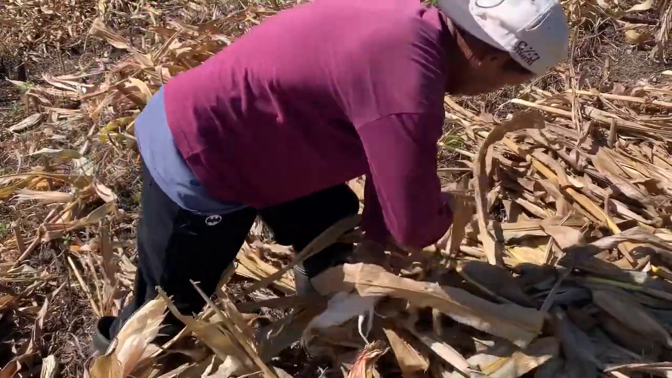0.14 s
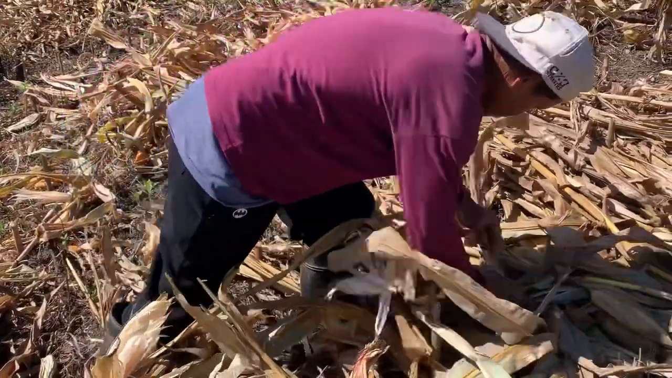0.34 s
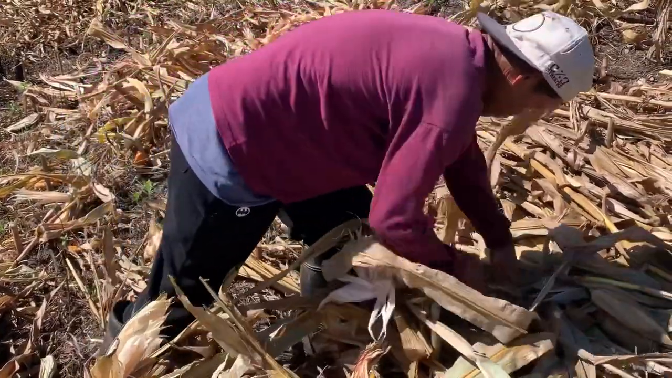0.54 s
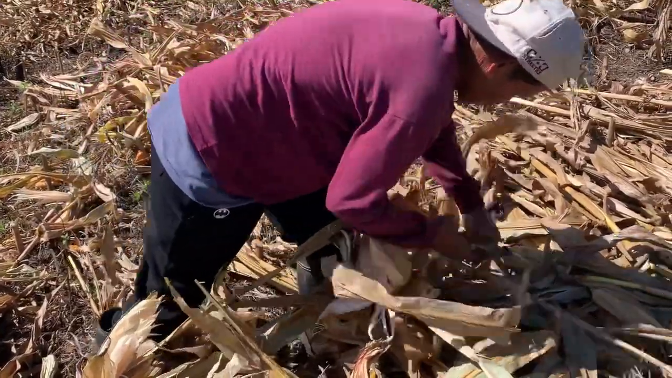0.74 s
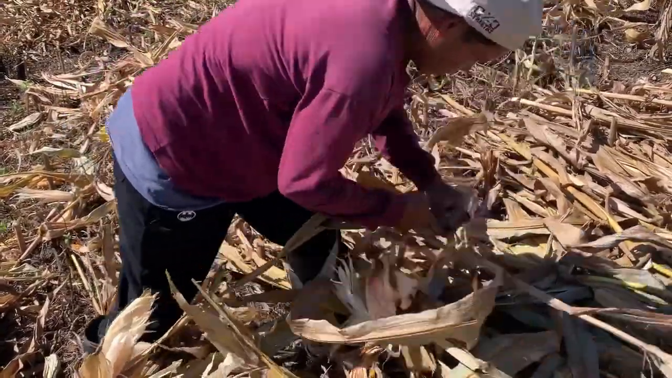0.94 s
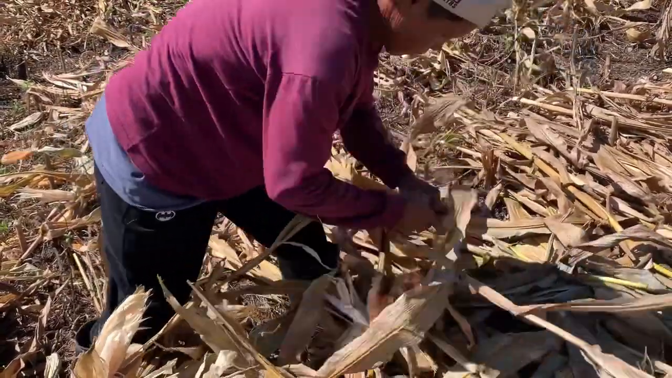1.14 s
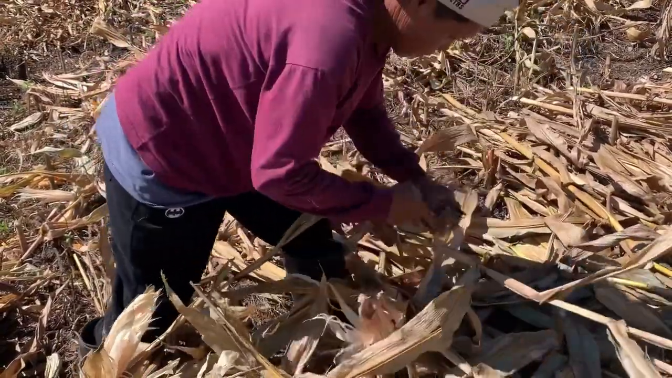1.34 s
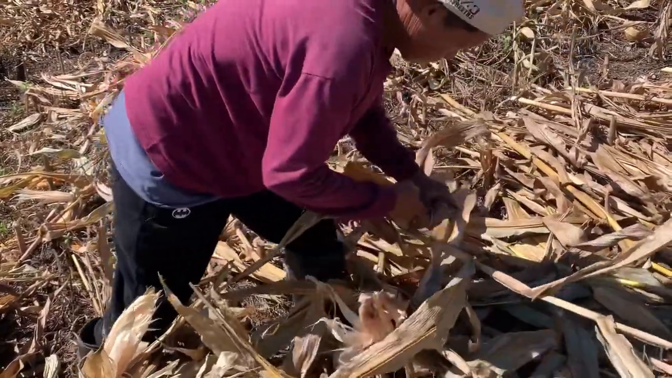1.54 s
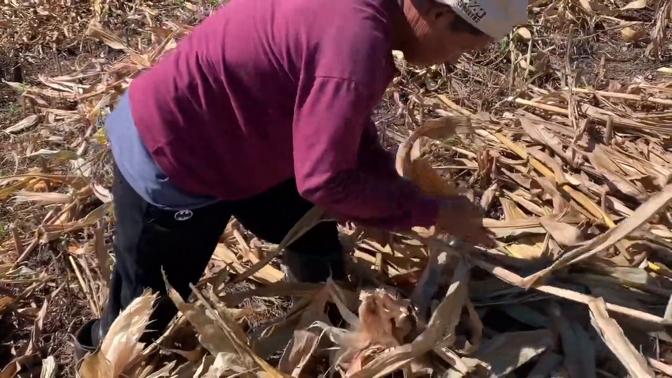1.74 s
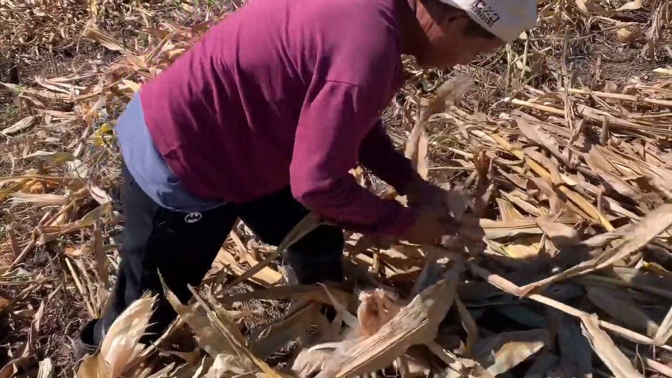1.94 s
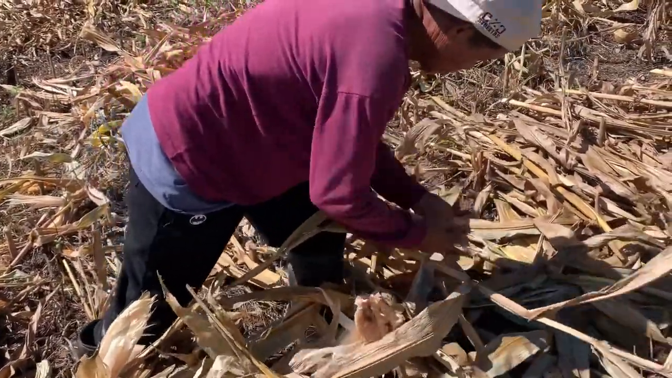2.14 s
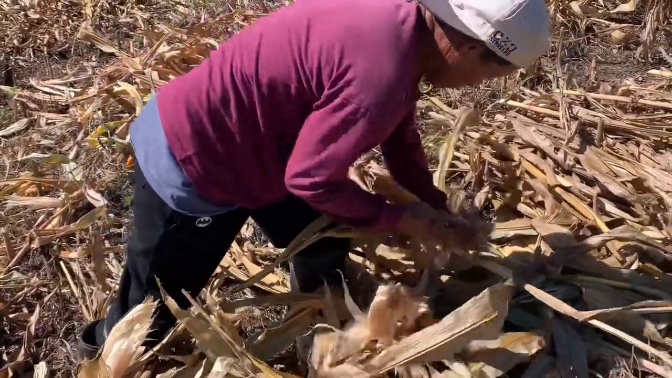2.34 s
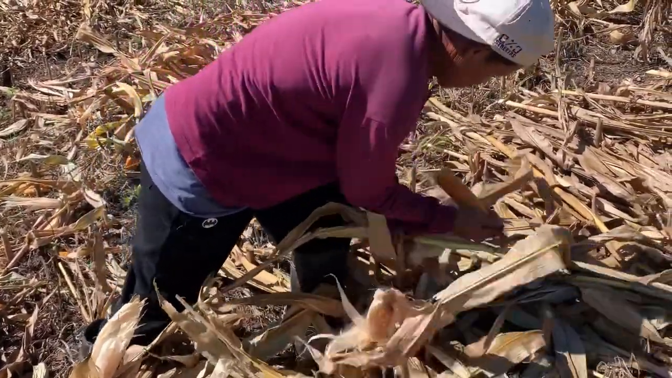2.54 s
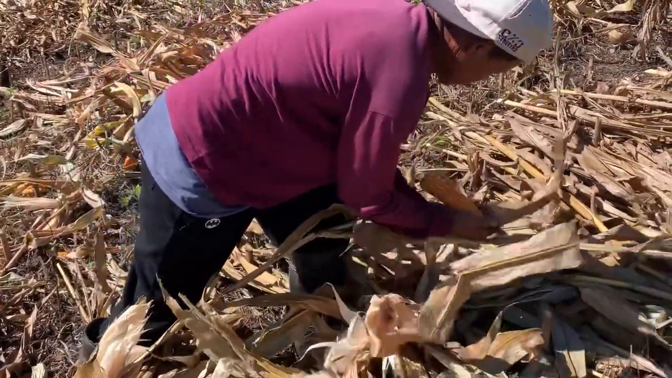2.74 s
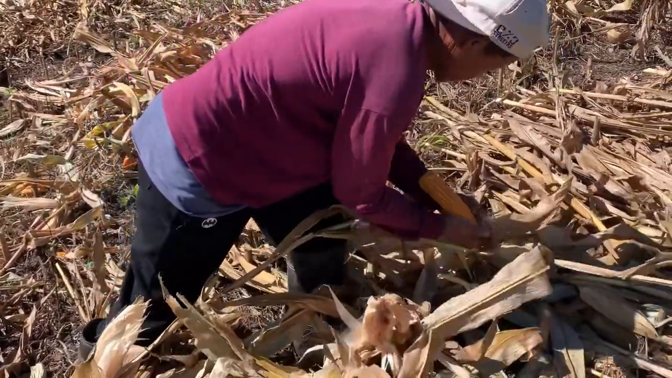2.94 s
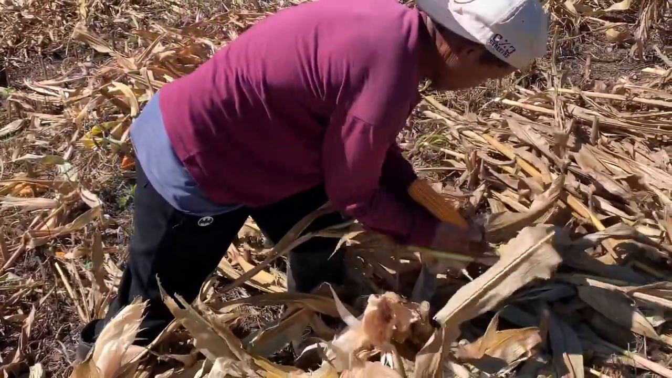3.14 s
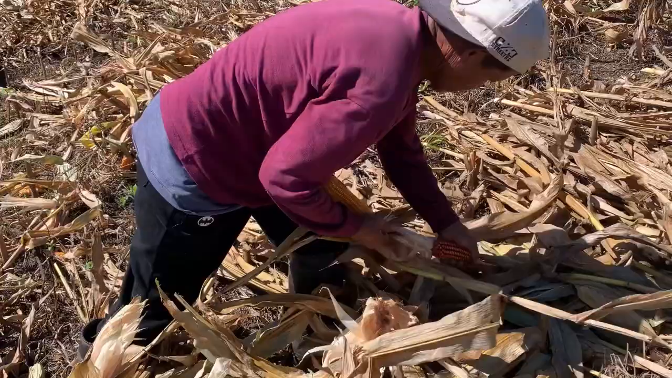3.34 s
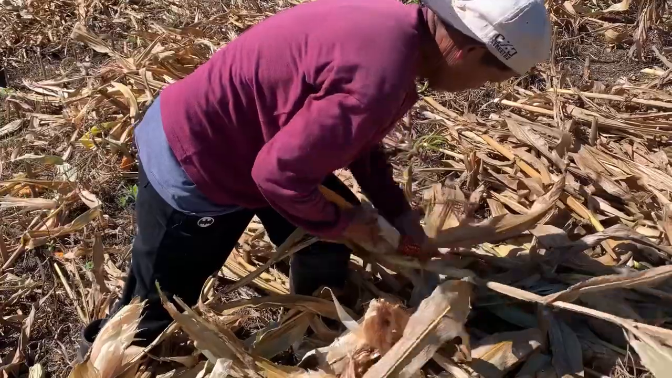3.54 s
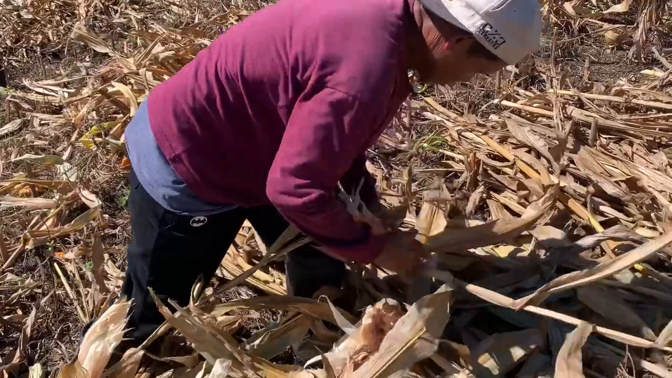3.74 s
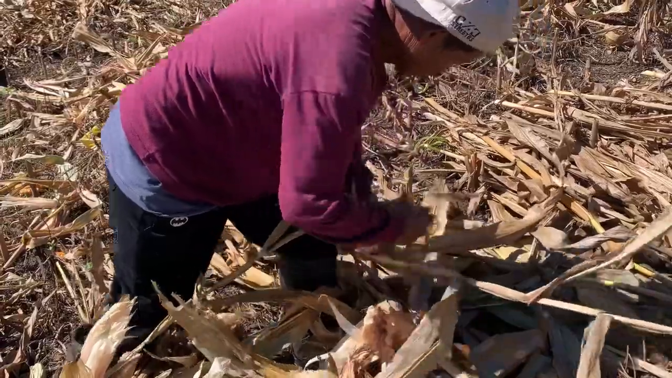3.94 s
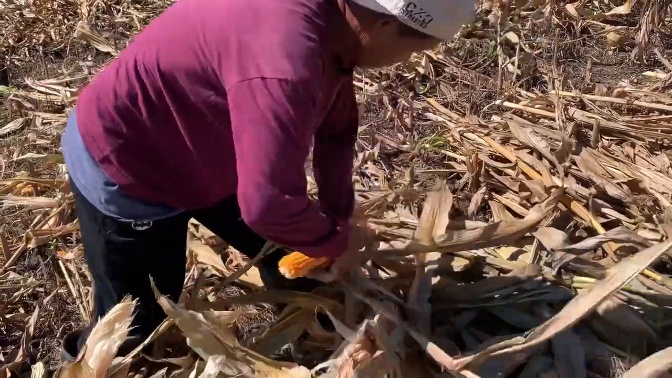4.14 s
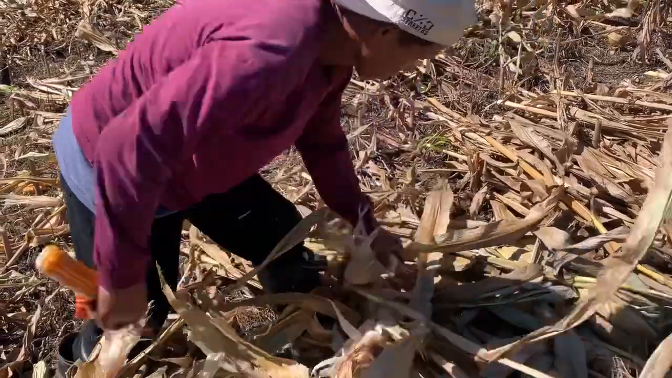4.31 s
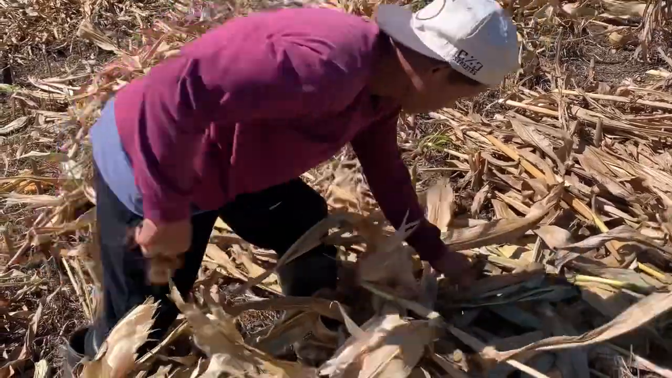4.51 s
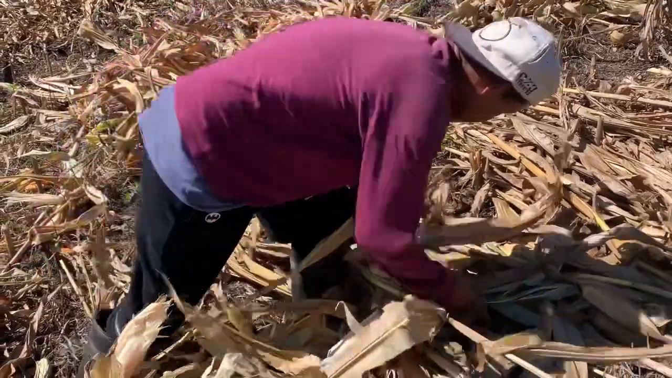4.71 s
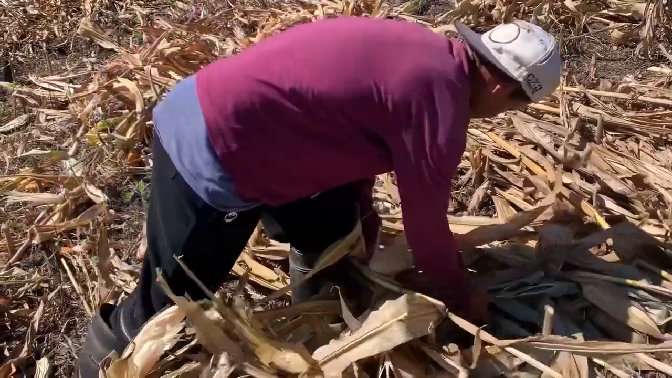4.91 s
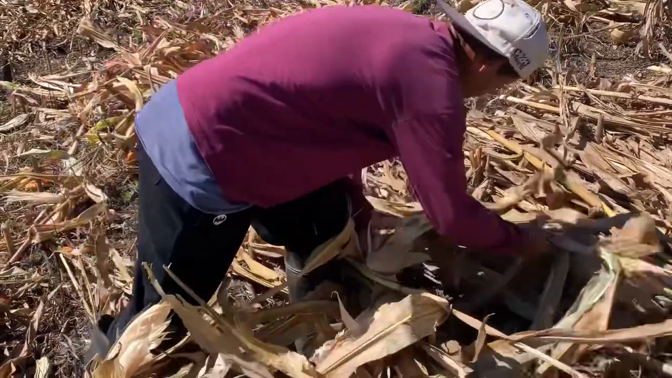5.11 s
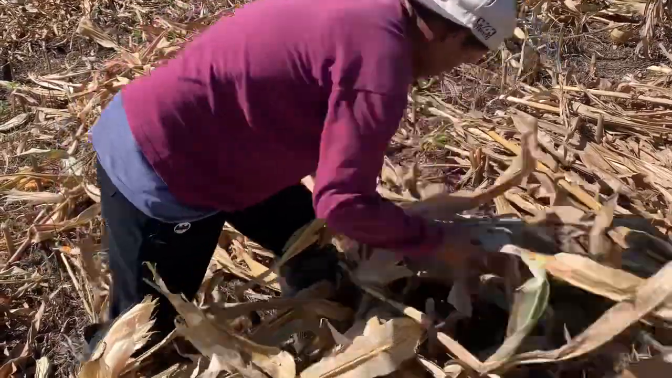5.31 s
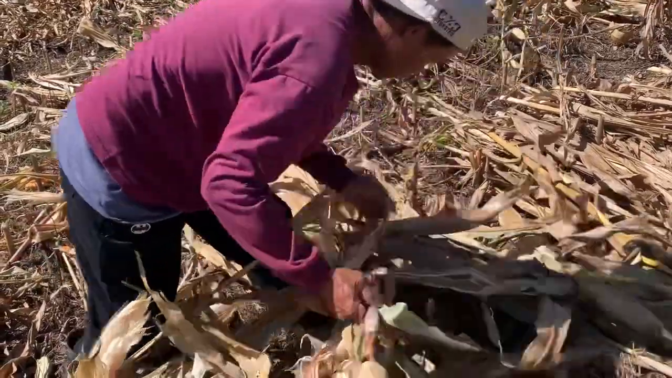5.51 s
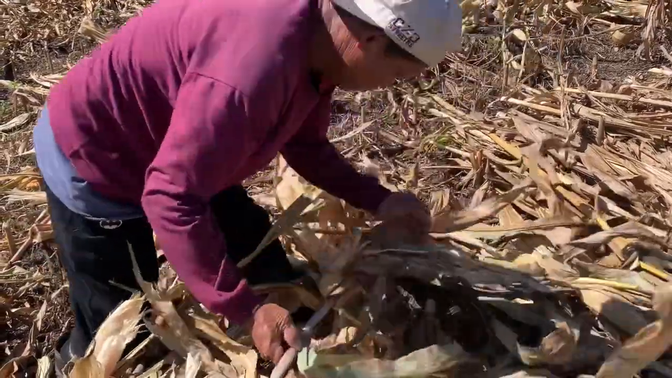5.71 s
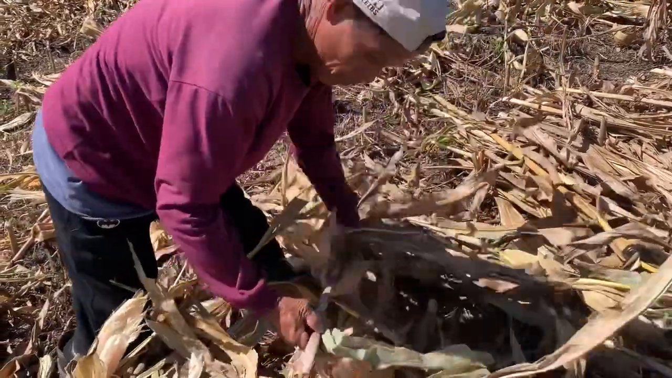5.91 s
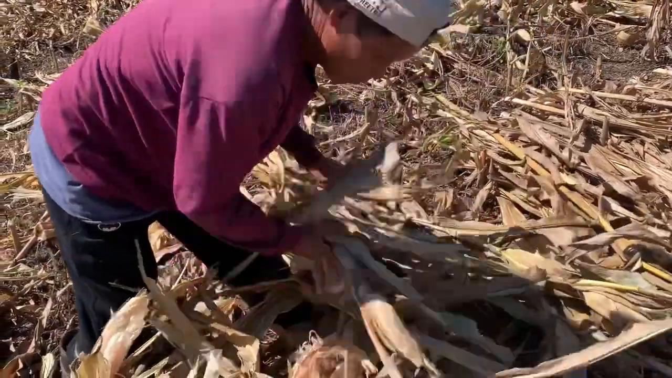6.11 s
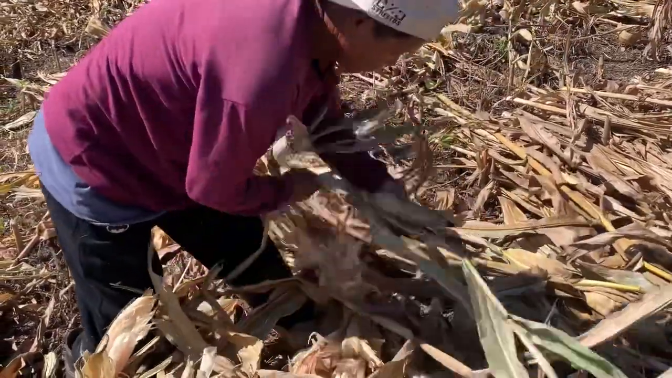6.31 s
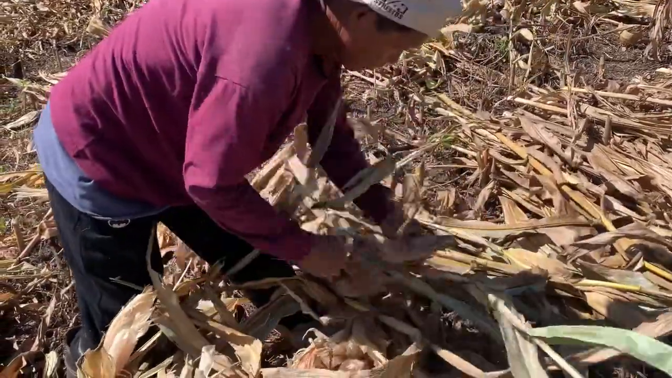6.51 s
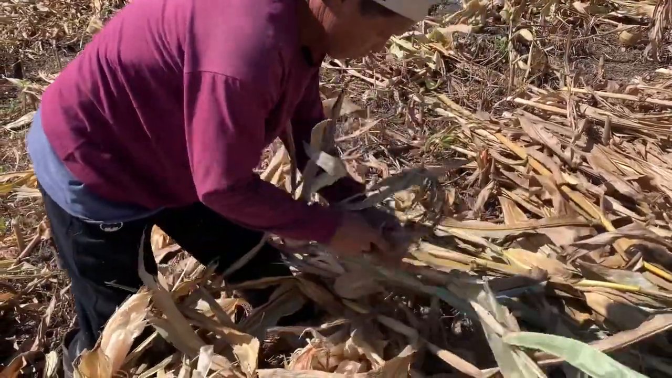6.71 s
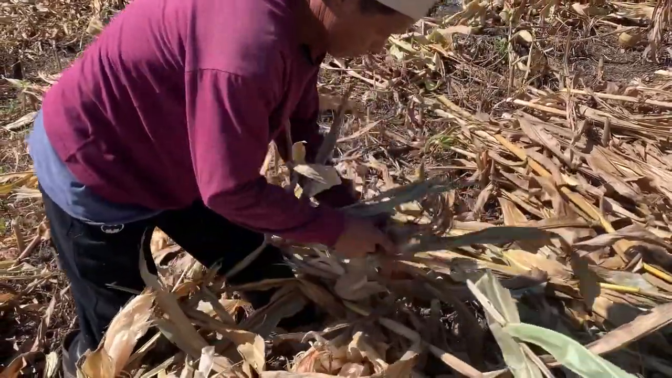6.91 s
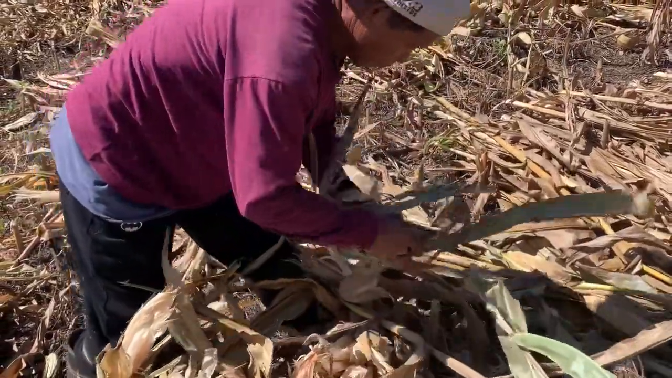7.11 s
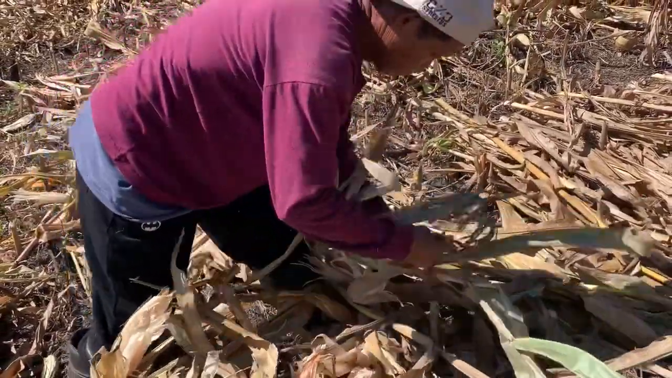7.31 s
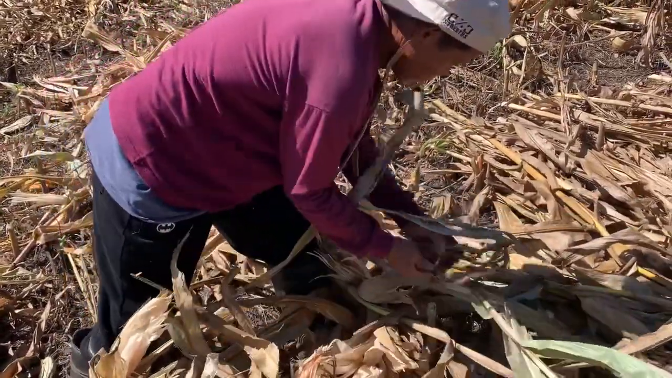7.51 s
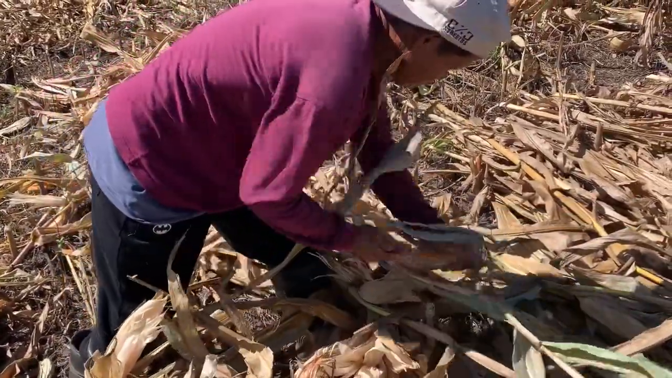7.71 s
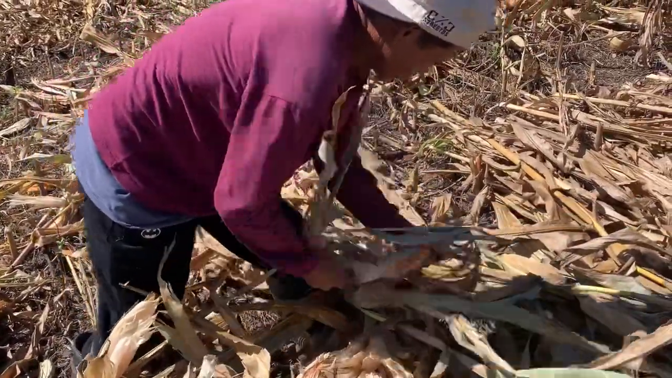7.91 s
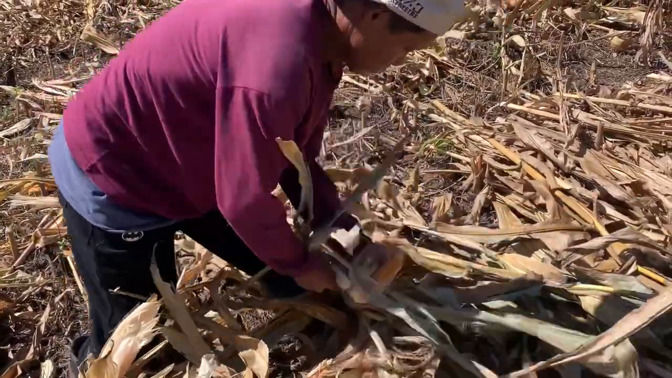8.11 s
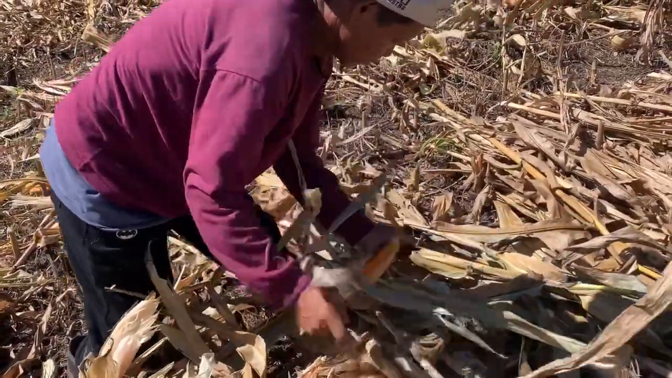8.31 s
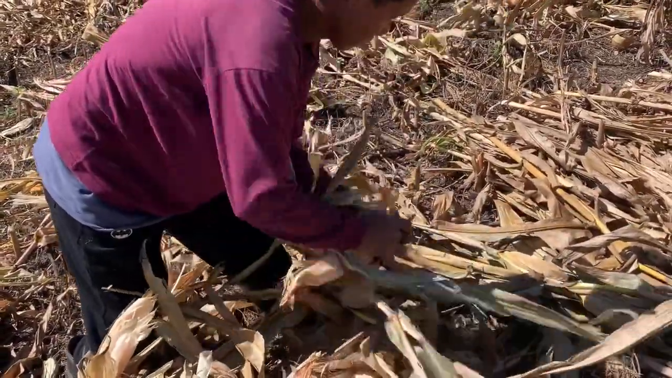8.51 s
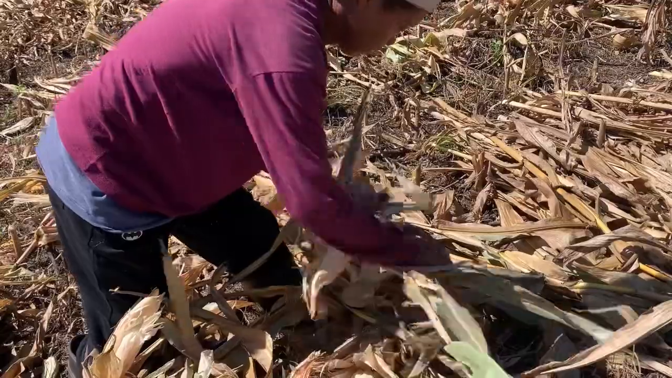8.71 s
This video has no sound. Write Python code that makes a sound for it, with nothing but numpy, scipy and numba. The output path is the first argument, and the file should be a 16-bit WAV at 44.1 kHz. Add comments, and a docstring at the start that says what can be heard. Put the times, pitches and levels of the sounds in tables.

```python
"""Dry corn husks are torn off by hand in an open field, a couple of metres from a two-port phone.
Throughout: leaves tick, crunch and fleck as decaying rings; stalks thud; filtered noise is the breeze.
First stirring and pulls; hard snaps and a knock near 2.2 s, a short lull near 3 s with snaps after it;
the strongest stirring runs from 5 to 6 s, eases until a burst of pulls near 7.7 s, and ends in
a few snaps and a low knock. The ports hear the heap with a lag and a little differently."""
import sys
import numpy as np
from scipy import signal
from scipy.fft import rfft, irfft, next_fast_len
from scipy.io import wavfile
from scipy.ndimage import uniform_filter1d, map_coordinates
from numba import njit

SR = 44100
rng = np.random.default_rng(int(sys.argv[2]) if len(sys.argv) > 2 else 0)


def dump_mix(stems):
    """Bounce the given channels to the path in sys.argv[1] as a 16-bit WAV at rate SR."""
    frames = np.atleast_2d(stems).T  # one column per channel
    limited = np.clip(frames, -1, 1)  # hard clip at full scale
    pcm = np.round(limited * 32767).astype(np.int16)
    wavfile.write(sys.argv[1], SR, pcm)


N = 385875

# breeze spectrum, tilted further in breeze(): f/Hz, density/dB per Hz
BREEZE_SPECTRUM = [(25, -29), (40, -6.5), (55, -7.5), (110, 0), (180, -10.5), (400, -8), (1000, -60)]
# heap levels: t/s, stalk thud level/dB, breeze level/dB
HEAP_LEVELS = [(0.0, -51.5, -57), (0.78, -52.5, -56.5), (2.12, -68, -61), (2.29, -42, -54.5),
               (2.36, -66, -60), (2.51, -42.5, -51.5), (2.75, -72, -60.5), (4.92, -49.5, -55),
               (4.97, -43, -50), (5.82, -49, -63), (6.02, -43.5, -56), (6.68, -58, -64), (7.6, -50, -59.5),
               (8.68, -57, -67.5), (8.75, -44, -55.5)]
# ears and stalks knocking on the heap: t/s, nominal peak level/dB, f/Hz, T60/s
STALK_KNOCKS = [(0.46, -38.5, 190, 0.064), (2.223, -19.5, 900, 0.03), (2.279, -37, 390, 0.05),
                (2.499, -31.5, 870, 0.056), (3.062, -33.5, 795, 0.054), (3.291, -26.5, 840, 0.064),
                (3.599, -33, 950, 0.038), (4.07, -38.5, 129, 0.11), (4.188, -39, 890, 0.068),
                (4.956, -33, 430, 0.03), (7.694, -29, 830, 0.047), (8.74, -36, 190, 0.079)]
# colour of the leaf: f/Hz, density/dB per Hz
LEAF_COLOUR = [(120, 15), (250, 17), (500, 11.5), (800, 3), (1100, -1), (1600, 6), (2400, 3), (4300, 5.5),
               (6500, 6.5), (9500, 9.5), (12000, 6), (15500, 10.5)]
# hands stirring the heap: t/s, rustle level/dB,
# then relative level/dB of: below 3.5 kHz (full by 1.75 kHz), near 4.4 kHz, above 6.5 kHz
HAND_STIRS = [(0.0, -34, 1, 6, 3.5), (0.6, -39.5, 0.5, 4, -3), (1.08, -32.5, -3, 9.5, 6),
              (1.49, -47, -5.5, 1, -0.5), (1.7, -34.5, -0.5, 3, 0), (2.0, -45, -1, 4.5, 2.5),
              (2.5, -37, 3, 6, 5), (3.05, -50, 0.5, 4.5, 1), (3.27, -34.5, 2, 6, 1.5),
              (3.48, -40.5, -0.5, 5.5, 2), (4.1, -39, 0, 1.5, -2), (4.54, -41, -0.5, 2.5, 0.5),
              (5.05, -28, -0.5, 3.5, 2), (5.52, -27, -3, 5.5, 4), (5.8, -36, -1.5, -1, -1),
              (6.05, -26.5, -2.5, 3.5, 3), (6.6, -37, -1.5, -1, -1), (6.65, -46, -3, -2, -2),
              (7.1, -39.5, 2, -0.5, -3), (7.7, -31, -2.5, 1, -0.5), (8.25, -35.5, 0, 2, 1),
              (8.66, -55, -1, 1.5, -5.5)]
# single pulls tearing a husk: peak t/s, level/dB, 10 dB fall time/s (5 ms at least), tilt/dB per octave
HUSK_PULLS = [(0.055, -31, 0.03, -1), (0.31, -34.5, 0.05, -0.5), (0.388, -32.5, -0.03, -4),
              (0.466, -32.5, 0, 0), (0.762, -37, -0.06, 3), (0.838, -30.5, 0.0553, 1),
              (0.96, -40.5, 0.04, 1), (1.3, -39.5, 0.1, -0.2), (2.036, -32, 0.02, -0.5),
              (2.2, -33, 0.06, 0), (2.227, -24.5, 0.0138, 0.5), (2.26, -28.5, 0.0137, 0.5),
              (2.289, -23, -0.01, -3.5), (2.539, -31.5, 0.054, 2), (2.62, -45, 0.2, 3.5),
              (2.82, -39.5, 0.02, -0.5), (2.979, -42.5, 0.07, 0.4), (3.064, -29.5, 0.017, 0.7),
              (3.23, -33, 0.01, -2.5), (3.31, -30, 0.05, 0), (3.565, -34.5, 0.04, -1.5),
              (3.605, -26.5, 0.02, -1.5), (4.032, -33, 0.1, 0.1), (4.19, -33, 0.11, 0.5),
              (4.29, -34, 0.01, -0.3), (4.59, -33, 0.03, 1), (4.66, -30, 0.1, 0), (4.73, -28.5, 0.07, 0),
              (4.96, -32.5, 0.07, -2), (5.931, -32, 0.07, 2), (6.3, -35, 0, 0), (6.72, -36.5, 0.1, -0.7),
              (6.855, -39, 0.08, 1.5), (7.11, -39, 0.1, 3), (7.32, -36, 0.16, 1.5), (7.4, -30, 0.04, 0),
              (7.665, -30, 0, 0.5), (7.702, -26, 0, 1.5), (7.8, -30.5, 0.04, 0), (7.99, -31.5, 0.04, -0.5),
              (8.075, -28.5, 0.02, -2.5), (8.5, -35.5, 0.2, 1.5), (8.691, -30.5, 0.015, -1),
              (8.735, -28, 0.06, -0.5)]
# snaps of husk and stalk: t/s, nominal peak level/dB, centre f/Hz
HUSK_SNAPS = [(0.047, -16, 7200), (0.06, -15.5, 7280), (0.382, -23, 3500), (0.462, -16.5, 1930),
              (0.803, -16.5, 7040), (0.829, -15, 4580), (0.839, -15, 4660), (0.847, -13, 4540),
              (0.859, -17, 4470), (1.091, -13.5, 3880), (1.659, -17, 7000), (2.026, -18.5, 7190),
              (2.031, -17.5, 4560), (2.038, -20, 1860), (2.212, -17, 2030), (2.224, -4.5, 1880),
              (2.229, -14, 4840), (2.285, -4.5, 4700), (2.49, -11.5, 7060), (2.506, -12, 6500),
              (2.534, -12.5, 2100), (2.554, -13, 7500), (3.02, -27, 2600), (3.055, -21, 7160),
              (3.063, -11, 2680), (3.07, -16, 4630), (3.074, -17, 2740), (3.181, -27, 2980),
              (3.24, -19.5, 5040), (3.3, -6, 2050), (3.32, -18, 2520), (3.364, -16.5, 5030),
              (3.572, -19, 7120), (3.886, -22, 7600), (4.006, -17, 7100), (4.048, -17.5, 5100),
              (4.186, -16, 7140), (4.275, -14, 7140), (4.578, -20, 2970), (4.589, -12, 4050),
              (4.643, -19, 2170), (4.655, -12.5, 4300), (4.776, -18, 2040), (4.865, -15, 2200),
              (5.03, -17.5, 2040), (5.055, -17, 5070), (5.071, -11.5, 2530), (5.162, -17, 7300),
              (5.933, -7, 4500), (6.047, -9.5, 4330), (6.066, -12, 4200), (6.1, -10.5, 7600),
              (6.111, -12, 4460), (6.123, -8.5, 4400), (6.322, -15, 7400), (6.456, -17.5, 7300),
              (6.986, -19, 7190), (7.002, -18.5, 7500), (7.023, -24, 7000), (7.106, -10, 7600),
              (7.551, -21, 2110), (7.695, -13, 3590), (7.701, -11, 2520), (7.707, -16, 1920),
              (7.722, -12.5, 2240), (7.981, -19.5, 1840), (8.676, -20.5, 1530), (8.7, -20, 1560),
              (8.741, -14, 1800)]
# pitches in one crack: ratio to the snap's centre f, level/dB
CRACK_PARTIALS = [(.55, -6.5), (1, 1.5), (1.7, -4.5)]
# left port against right: f/Hz, gain/dB
LEFT_GAIN_DB = [(400, 0), (800, -6), (1500, -3), (2600, 0), (4300, -3), (5900, -7), (7700, 0)]
# likeness of the ports: f/Hz, correlation/0-1
PORT_LIKENESS = [(40, .3), (90, .55), (200, .92), (550, .8), (1500, .85), (2200, .8), (3200, .15),
                 (4500, .5), (5500, .05), (7200, .62), (8500, .8), (9100, .998)]
# phase of the left port behind the right, rising with pitch: f/Hz, lag/half cycles
LEFT_LAG_HALF_CYCLES = [(0, 0), (450, .3), (570, 1), (860, 1.6), (1800, 2), (7000, 2.05), (7750, 2.3),
                        (9100, 2.98), (9900, 3.02), (11450, 3.97), (12650, 4.02), (14250, 5), (15100, 5),
                        (15700, 5.1)]

PULL_ROUND = 1.54  # above 1: rounded top, steeper edges
PULL_RISE = 0.87  # rise time / fall time
SPLINTER_T60_S, TEAR_T60_S = .006, .032
TOP_HZ = 15750


def undb(db):
    """Gain of a level in dB."""
    return 10 ** (np.asarray(db) / 20)


def level(x, rms_db):
    """Set the rms."""
    return x * undb(rms_db) / np.sqrt(np.mean(x ** 2))


def along_hz(table, hz):
    """A (Hz, value) table read on a log-frequency axis."""
    f, v = np.transpose(table)
    return np.interp(np.log(np.maximum(hz, 1.)), np.log(f), v)


def along_s(table, s):
    """The columns of a curve table at times s."""
    t, *columns = np.transpose(table)
    return [np.interp(s, t, c) for c in columns]


def walk(rate_hz):
    """Random levels held 1 / rate_hz s and slewed twice."""
    hold = int(SR / rate_hz)
    steps = np.repeat(rng.standard_normal(N // hold + 1), hold)
    return 1.08 * uniform_filter1d(uniform_filter1d(steps, hold), hold)[:N]


@njit
def ring(start, hz, cycles, size, count):
    """Sum of damped sines; each falls by 1/e in its number of cycles."""
    out = np.zeros(count)
    for g in range(len(start)):
        w = 2 * np.pi * hz[g] / SR
        pole = np.exp(complex(-w / (2 * np.pi * cycles[g]), w))
        z = complex(size[g], 0.)
        for i in range(start[g], min(count, start[g] + int(6 * cycles[g] * SR / hz[g]))):
            out[i] += z.imag
            z *= pole
    return out


def ticks(s, hz, db, cycles, spread_octaves=2.4):
    """Scraps of leaf in its colour, some dead, some ringing; the air hears the change of their motion."""
    sign_chance, ring_chance = rng.random((len(s), 2)).T
    # high ticks ring for more cycles
    rings = cycles * 2 ** (spread_octaves * ring_chance) * np.sqrt(1 + hz / 4000)
    size = np.sign(sign_chance - .5) * undb(db + along_hz(LEAF_COLOUR, hz)) / np.sqrt(rings)
    start = np.clip(s * SR, 0, N - 1).astype(np.int64)
    return np.diff(ring(start, hz, rings, size, count=N), prepend=0)


def clusters(s, db, centre_hz, t60_s, octaves, cycles, count, lead=0):
    """A fold gives way in a dying volley of ticks, the share lead of them creaking ahead of the break."""
    paths = []
    for _ in range(2):  # each path to the phone gets its own volleys
        chance = rng.random((len(s), count, 3))
        late_s = .5 * t60_s[:, None] * chance[..., 0] ** 1.7
        late_s = np.where(np.arange(count) < lead * count, -late_s, late_s)
        hz = centre_hz[:, None] * 2 ** (octaves * (chance[..., 1] + chance[..., 2] - 1))
        hz = np.where(hz > 17000, 17000 ** 2 / hz, hz)  # fold back below 17 kHz
        decay_db = 60 * np.abs(late_s) / t60_s[:, None]
        tick_db = db[:, None] - decay_db - 10 * np.log10(centre_hz[:, None] / 4000)
        paths.append(ticks((s[:, None] + late_s).ravel(), hz.ravel(), tick_db.ravel(), cycles))
    return np.array(paths)


def pulled(s, hz):
    """Power of all pulls at times s and pitches hz: each swells quickly and dies away."""
    peak_s, db, fall_s, tilt_db = np.transpose(HUSK_PULLS)[..., None]
    after = (s - peak_s) / np.maximum(fall_s, .005)
    shape_db = -10 * np.maximum(after, -after / PULL_RISE) ** PULL_ROUND
    octaves = np.clip(np.log2(hz / 2800), -1, 1.5)
    return np.sum(undb(db + shape_db + tilt_db * octaves) ** 2, axis=0)


def handled(s, hz):
    """Tick level in dB: stirring and pulls drive the leaf, stalk thuds take over below 800 Hz."""
    stir_db, body_db, rasp_db, sheen_db = along_s(HAND_STIRS, s)
    drive_db = 10 * np.log10(undb(stir_db) ** 2 + pulled(s, hz))
    thud = np.clip(np.log2(800 / hz), 0, 1)
    body = np.clip(np.log2(3500 / hz), 0, 1)
    rasp = np.clip(1 - np.abs(np.log2(hz / 4400)) / .5, 0, 1)
    sheen = np.clip(np.log2(hz / 6500), 0, 1)
    leaf_db = drive_db + body * body_db + rasp * rasp_db + sheen * sheen_db
    return (1 - thud) * leaf_db + thud * along_s(HEAP_LEVELS, s)[0]


def breeze():
    """Low rumble of the open field: shaped noise, swelling slowly."""
    hz = np.fft.rfftfreq(N, 1 / SR)
    spectrum = undb(along_hz(BREEZE_SPECTRUM, hz) - hz / 300)
    air = irfft(rfft(rng.standard_normal((2, N))) * spectrum, N)
    swelling = level(air * undb(0.5 * walk(4.8)), 1.8)
    return swelling * undb(along_s(HEAP_LEVELS, np.arange(N) / SR)[1])


def knocks():
    """Five quickly damped rings of alternating sign around each knock's pitch."""
    s, db, hz, t60_s = np.transpose(STALK_KNOCKS)
    chance = rng.random((len(s), 5, 2))
    part_hz = hz[:, None] * 2 ** (0.83 * (chance[..., 0] - .5))
    start = ((s[:, None] + 0.00567 * chance[..., 1]) * SR).astype(np.int64)
    cycles = np.clip(t60_s, .02, .2)[:, None] * part_hz / np.log(1000)
    size = undb(db - 5.0)[:, None] * (-1) ** np.arange(5)
    return ring(start.ravel(), part_hz.ravel(), cycles.ravel(), size.ravel(), count=N)


def rustle(count=90000):
    """Dense bed of single leaf ticks in quick flurries; each scrape favours its own pitches."""
    flurry_db = 1.57 * walk(60)
    patch_db = 2.96 * np.array([walk(22)[::64] for _ in range(21)])  # pitch by time
    paths = []
    for _ in range(2):
        time_chance, pitch_chance, size_chance = rng.random((count, 3)).T
        s = time_chance * N / SR
        hz = 120 * (17000 / 120) ** np.sqrt(pitch_chance)
        place = [20 * np.log(hz / 120) / np.log(17000 / 120), time_chance * N / 64]
        scrape_db = map_coordinates(patch_db, place, order=1, mode="nearest")
        scrape_db = flurry_db[(time_chance * N).astype(int)] + scrape_db
        size_db = -1.5 * np.log(size_chance + hz / 3e5)  # the finest ticks are the most alike
        # high ticks are more numerous, so each is smaller
        crowding_db = 10 * np.log10(np.log(hz / 100))
        db = handled(s, hz) + scrape_db + size_db - crowding_db
        paths.append(ticks(s, hz, db, cycles=0.48))
    return undb(8.5) * np.array(paths)


def flecks(count=900):
    """Lone dry clicks: a scrap of husk breaks within 1 ms, at several pitches together."""
    time_chance, pitch_chance, size_chance = rng.random((count, 3)).T
    s = time_chance * N / SR
    centre_hz = 1500 * 2 ** (1.6 * pitch_chance)
    # .75: they stand out most in the lulls
    db = handled(s, centre_hz) * .75 - 3 * np.log(size_chance + .03) - 1
    return clusters(s, db, centre_hz, np.full(count, .002), octaves=1.3, cycles=1.2, count=6)


def crackle(count=1300):
    """Small crunches at chance moments: volleys of ringing ticks, each near its own pitch."""
    time_chance, pitch_chance, size_chance, decay_chance = rng.random((count, 4)).T
    s = time_chance * N / SR
    centre_hz = 700 * 2 ** (3.5 * pitch_chance)
    t60_s = .012 + .04 * decay_chance
    db = handled(s, centre_hz) - 1.6 * np.log(size_chance + 0.15) + 6.17
    return clusters(s, db, centre_hz, t60_s, octaves=.2, cycles=9, count=14, lead=.4)


def snaps():
    """Loud breaks: a sharp crack at several pitches together, splinters, and fibres tearing."""
    s, db, centre_hz = np.transpose(HUSK_SNAPS)
    crack = 0
    for ratio, part_db in CRACK_PARTIALS:
        hz = np.minimum(centre_hz * ratio, 13000)
        crack_db = db + part_db - 16 * np.log10(hz / 4000)
        crack = crack + ticks(s + .0008, hz, crack_db, cycles=1.7, spread_octaves=0.67)
    splinter_t60_s = np.full(len(s), SPLINTER_T60_S)
    splinters = clusters(s, db - 5.0, centre_hz, splinter_t60_s, octaves=1.65, cycles=0.8, count=14)
    tear_t60_s = np.full(len(s), TEAR_T60_S)
    tear = clusters(s, db - 9.0, centre_hz, tear_t60_s, octaves=1.0, cycles=9.0, count=80, lead=.15)
    return crack + splinters + tear


def scene():
    """Two paths from the heap to the phone."""
    return breeze() + knocks() + rustle() + flecks() + crackle() + snaps()


def record(dry):
    """The ports share one path in part; the left is shaded and late; peaks are rounded, the top cut."""
    size = next_fast_len(N + 4096)
    hz = np.fft.rfftfreq(size, 1 / SR)
    shared, own = rfft(dry, size)
    alike = along_hz(PORT_LIKENESS, hz)
    lag = np.exp(-1j * np.pi * np.interp(hz, *np.transpose(LEFT_LAG_HALF_CYCLES)))
    left = alike * shared * lag + np.sqrt(1 - alike ** 2) * own
    left = undb(along_hz(LEFT_GAIN_DB, hz)) * left
    ports = irfft(np.array([left, shared]), size)[:, :N]
    ports = .95 * np.tanh(ports / .95)
    ports = signal.sosfilt(signal.butter(1, 35, "highpass", fs=SR, output="sos"), ports)
    return signal.sosfilt(signal.ellip(12, .2, 90, TOP_HZ, fs=SR, output="sos"), ports)


dry = scene()
out = record(dry)
dump_mix(out)
```